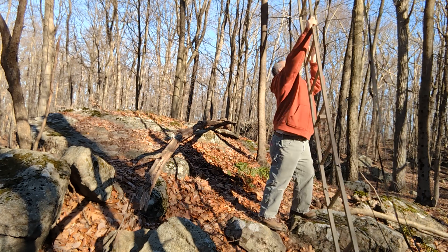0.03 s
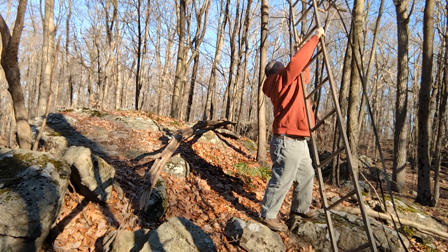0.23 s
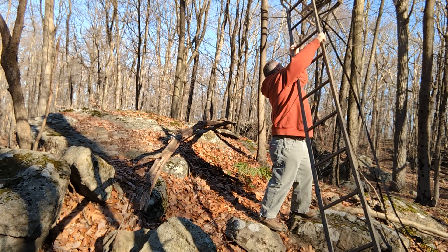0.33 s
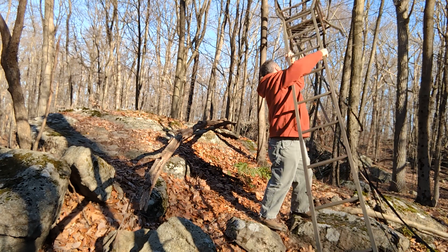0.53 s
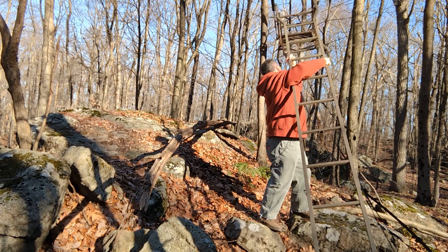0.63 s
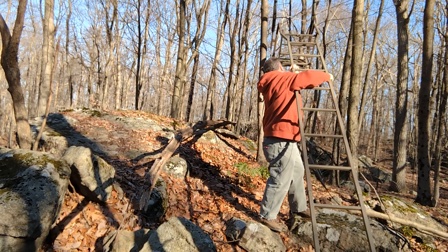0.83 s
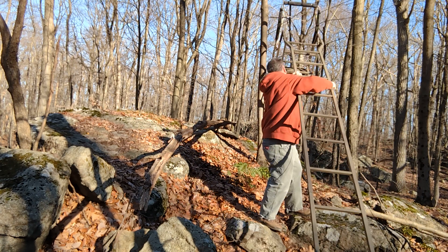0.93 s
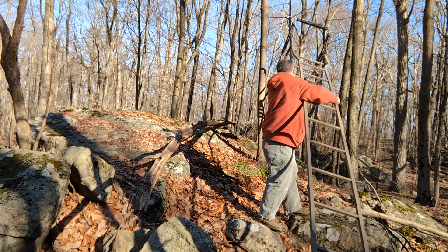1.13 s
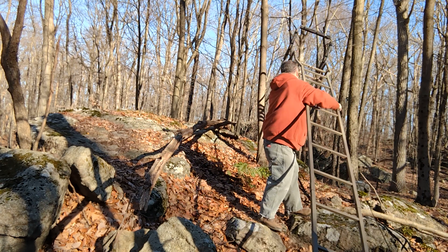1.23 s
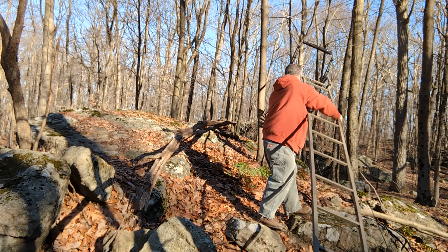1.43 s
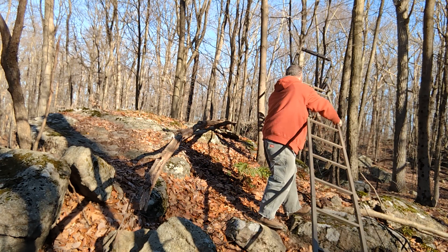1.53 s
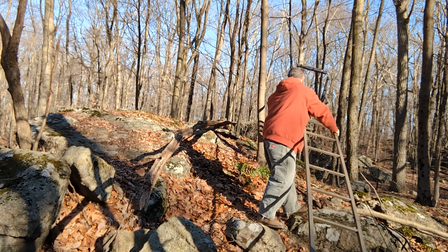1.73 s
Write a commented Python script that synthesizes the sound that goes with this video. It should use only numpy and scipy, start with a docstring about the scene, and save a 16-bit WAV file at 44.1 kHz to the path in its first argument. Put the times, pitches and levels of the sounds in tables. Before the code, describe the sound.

A metal ladder rattles and drags through dry leaves in the woods, a few metres off and slightly right. It lands with a ringing thump, followed by clanks, crunching leaves and snapping twigs that fade with a short echo.

```python
"""Dry leaves rustle faintly, then scrape, as a steel ladder stand is swung round on a rocky forest floor,
a few metres from the microphone and a little to the right. Its feet drag through the leaves and one
thumps down; the loose joints chatter, the tubes clank and the frame rings and hums. Twigs snap and
leaves crunch as it settles. Ground and rocks throw back near echoes; trunks scatter a short tail."""
import sys
import numpy as np
from scipy import signal
from scipy.fft import rfft, irfft, next_fast_len
from scipy.io import wavfile
from scipy.ndimage import map_coordinates

SR = 44100
rng = np.random.default_rng(int(sys.argv[2]) if len(sys.argv) > 2 else 0)


def transcribe(u):
    """Save the signal u as a 16-bit wav file named by the first command-line argument.

    u: samples, shape (n,) or (channels, n), limited to [-1, 1]; the rate is SR.
    q: integer samples, one column per channel.
    """
    v = np.clip(np.atleast_2d(u).T, -1, 1)
    q = np.round(v * 32767).astype(np.int16)
    wavfile.write(sys.argv[1], SR, q)


N = 79380
TOP_HZ, LOW_CUT_HZ = 16400, 31  # the microphone's band
ATTACK_S = 0.00064  # rise of a knock or snap


def amp(db):
    """Decibels to gain."""
    return 10 ** (np.asarray(db) / 20)


def unit(x):
    """Scale to rms 1."""
    return x / np.sqrt(np.mean(x ** 2) + 1e-20)


def sized(x, reference, db=0):
    """x scaled to the energy of the reference, then raised by db."""
    return amp(db) * unit(x) * np.sqrt(np.mean(reference ** 2))


def decay(t, t60):
    """A fall of 60 dB every t60 seconds."""
    return np.exp(-np.log(1000) * t / t60)


def curve(points):
    """Join (t/s, value) points, one value per sample."""
    return np.interp(np.arange(N) / SR, *np.transpose(points))


def gain_at(spectrum, f):
    """Gain at f from (f/Hz, level/dB) points joined on a log frequency axis."""
    hz, db = np.transpose(spectrum)
    return amp(np.interp(np.log(f + 1), np.log(hz + 1), db))


def filtered(x, response):
    """x through a complex frequency response."""
    size = next_fast_len(N + SR)
    f = np.fft.rfftfreq(size, 1 / SR)
    return irfft(rfft(x, size) * response(f), size)[..., :N]


def resonate(x, peaks):
    """x through parallel (f/Hz, width/Hz, level/dB) resonances of alternating sign."""
    def response(f):
        return sum((-1) ** k * amp(db) * 1j * f * width / (hz * hz - f * f + 1j * f * width)
                   for k, (hz, width, db) in enumerate(peaks))
    return filtered(x, response)


def ring(modes, start, spread_db):
    """Damped modes struck at start, their strengths a little different at each blow."""
    t = np.maximum(np.arange(N) / SR - start, 0)
    return sum(amp(db + spread_db * rng.standard_normal()) * np.sin(2 * np.pi * hz * t) * decay(t, t60)
               for hz, db, t60 in modes)


def crackle(per_s, spread_db, hiss_share):
    """Tiny contacts of random size over a bed of hiss, rms about 1."""
    sizes = amp(spread_db * np.minimum(rng.exponential(size=N), 3.5))
    signs = rng.choice([-1, 1], N)
    clicks = unit(sizes * signs * (rng.random(N) < per_s / SR))
    return np.sqrt(1 - hiss_share) * clicks + np.sqrt(hiss_share) * rng.standard_normal(N)


def flurry(start, db, hold, t60, per_s, hiss_share):
    """One sharp contact followed by a dying flurry of small ones."""
    t = np.arange(N) / SR - start
    envelope = np.clip(t / ATTACK_S, 0, 1) * decay(np.maximum(t - hold, 0), t60)
    first = unit(1.0 * (np.arange(N) == int((start + ATTACK_S) * SR)))
    rest = unit(envelope * crackle(per_s, spread_db=3, hiss_share=hiss_share))
    first_share = 0.4 * ATTACK_S / (ATTACK_S + hold / 2)  # of the energy; most in brief knocks
    return sized(np.sqrt(first_share) * first + np.sqrt(1 - first_share) * rest, envelope, db)


# Spectrum of the forest air around the microphone: f/Hz, level/dB
AIR_SPECTRUM = [(20, -42), (35, -12), (50, -6), (85, -2), (130, -9.5), (300, -12), (1000, -36.5),
                (5000, -24), (16000, -27.5)]
def air():
    """A faint outdoor rumble, mostly common to both sides."""
    noise = rng.standard_normal(N) + np.array([[.7], [.3]]) * rng.standard_normal((2, N))
    return amp(-68) * unit(filtered(noise, lambda f: gain_at(AIR_SPECTRUM, f)))


def trunks(x, t60):
    """The surrounding trunks scatter the sound into a diffuse stereo tail."""
    t = np.arange(SR // 2) / SR
    tail = rng.standard_normal((2, len(t))) * decay(t, t60)
    tail /= np.linalg.norm(tail, axis=1, keepdims=True)
    return signal.fftconvolve(x, tail, axes=1)[:, :N]


def near_echoes(x, count=8, delay_scale_s=.005, drift_hz=25.16):
    """Echoes off ground and rocks; their strengths drift with the motion, their total power stays."""
    spacing = (np.arange(count) + rng.random(count) + 1) / count
    delays = (delay_scale_s * SR * spacing ** 2).astype(int)
    knots = np.arange(N) * drift_hz / SR
    gains = np.array([map_coordinates(rng.standard_normal(400), [knots], mode="mirror") for _ in delays])
    gains /= np.linalg.norm(gains, axis=0)
    return sum(gain * np.pad(x, (delay, 0))[:N] for gain, delay in zip(gains, delays))


def from_right(f, lag_s=.00012):
    """Stereo response of a sound that reaches the microphone's right side first."""
    return np.exp(1j * np.pi * f * lag_s * np.array([[-1], [1]]))


def pan(right_db):
    """Stereo gains with the right side right_db above the left."""
    return amp([[-right_db / 2], [right_db / 2]])


# Scattered against direct sound at the microphone, before wet_db is added: f/Hz, level/dB
SCATTER_SPECTRUM = [(100, -14), (400, -19), (900, -3.5), (2500, 0.5), (6000, 3.5), (14000, 7)]
def place(x, right_db, wet_db):
    """Set a source a few metres off: direct sound plus near echoes that blur the treble."""
    def wet(f):
        return gain_at(SCATTER_SPECTRUM, f) * amp(wet_db)
    direct = filtered(x, lambda f: from_right(f) / np.hypot(1, wet(f)))
    echoes = np.array([near_echoes(x), near_echoes(x)])
    scattered = filtered(echoes, lambda f: wet(f) / np.hypot(1, wet(f)))
    return (direct + scattered) * pan(right_db)


# Soft footfalls on the rock: t/s, level/dB
FOOTFALLS = [(1.024, -64.5), (1.49, -84), (1.535, -64), (1.662, -72)]
# Modes of the ground underfoot: f/Hz, level/dB, t60/s
GROUND_MODES = [(56.4, 4, .14), (80, -4, .08)]
def footfalls():
    """Shifting weight gives dull pushes into the ground."""
    return sum(amp(db) * ring(GROUND_MODES, start, spread_db=2) for start, db in FOOTFALLS)


# Swell of the hum as the stand sways: t/s, level/dB
SWAY_LEVEL = [(0, -94), (.3, -68.5), (1.08, -69.5), (1.17, -58), (1.35, -66), (1.55, -67.5), (1.8, -83.5)]
# Low resonances of the rails: f/Hz, width/Hz, level/dB
RAIL_PEAKS = [(157.6, 13, -2), (238.5, 22.5, -6.5), (330, 140, -13.5)]
def rail_hum():
    """The long rails flex and hum as the stand sways."""
    return amp(curve(SWAY_LEVEL)) * unit(resonate(rng.standard_normal(N), RAIL_PEAKS))


# Blows to the frame: t/s, level/dB
FRAME_BLOWS = [(.284, -52), (.485, -58), (.818, -56), (.987, -57), (1.177, -67), (1.466, -71)]
# Long-ringing modes of the steel frame: f/Hz, level/dB, t60/s
FRAME_MODES = [(695, -8, .45), (848, -8, .35), (985, -7, .3), (1103, 1.5, .45), (1696, -3.5, .6),
               (1825, -8, .4), (2315, -6, .6), (2519, -7, .6), (2615, -6, .5), (3256, -9, .5),
               (5835, -8, .4)]
def frame_ring():
    """The whole frame rings on after the harder blows."""
    return sum(amp(db) * ring(FRAME_MODES, start, spread_db=6) for start, db in FRAME_BLOWS)


# Twigs and leaves breaking on the forest floor: t/s, level/dB, hold/s, t60/s, f/Hz
TWIG_SNAPS = [(0.047, -51, 0.0051, 0.2, 7400), (0.197, -43.5, 0.0014, 0.015, 7050),
              (0.683, -32.5, 0.0014, 0.009, 14900), (.646, -40.5, .004, .015, 7360),
              (0.765, -52, 0.0011, .008, 5000), (.8165, -36, .003, .04, 10300),
              (0.872, -34, .002, 0.017, 10400), (0.943, -36, .001, 0.013, 5000),
              (.9735, -50, 0.00078, .012, 14500), (.987, -40, 0.0036, 0.021, 13100),
              (1.0178, -32, 0.0014, 0.012, 14700), (1.142, -41.5, .003, 0.046, 11500),
              (1.176, -48, 0.006, 0.078, 11100), (1.193, -48, 0.0022, .012, 9750),
              (1.243, -50, .001, .012, 14000), (1.274, -46.5, 0.0014, .02, 10900),
              (1.3196, -48, 0.0036, .05, 9000), (1.414, -43, .002, .025, 4540),
              (1.463, -48.5, 0.0085, 0.037, 10600), (1.5415, -46.5, 0.0018, 0.041, 4500),
              (1.7155, -55.5, 0.0035, 0.068, 14000)]
def twig_snaps(width_ratio=0.091, low_edge_hz=900):
    """Dry twigs and leaves break in bright bursts: a narrow resonance over thin crackle."""
    out = np.zeros(N)
    for start, db, hold, t60, hz in TWIG_SNAPS:
        crack = flurry(start, db, hold, t60, per_s=2500, hiss_share=0.4)
        pitched = resonate(crack, [(hz, width_ratio * hz, 0)])
        thin = filtered(crack, lambda f: (1j * f / (low_edge_hz + 1j * f)) ** 2)
        out += sized(pitched + 0.54 * thin, crack, db=1)
    return out


# Strength of the drag through the leaves, just right of centre: t/s, level/dB
DRAG_LEVEL = [(0, -55), (.12, -58), (.18, -57), (.23, -55.5), (.31, -52.5), (.35, -45), (.41, -41.5),
              (.455, -45), (.495, -35), (.54, -40), (.67, -43.5), (.71, -49), (.79, -48.5), (.84, -43),
              (.93, -45.5), (1.0, -51.5), (1.1, -52.5), (1.2, -51), (1.3, -57), (1.39, -62.5),
              (1.48, -53.5), (1.56, -59), (1.68, -72), (1.8, -73)]
# Spectrum of the dry leaves from a few metres: f/Hz, level/dB
LEAF_SPECTRUM = [(60, -31), (130, -14.5), (200, -16), (400, -4), (700, -4), (1100, -3), (1400, -3.5),
                 (2500, 0), (4000, -4), (5000, -4), (7200, -5.5), (8000, -11), (9000, -5), (11000, -8.5),
                 (13000, -4.5), (16000, -14)]
def leaf_drag():
    """The feet plough through dry leaves, which rustle all around; the grit sets the frame singing."""
    level = amp(curve(DRAG_LEVEL))
    grit, left, right = [level * crackle(per_s=5000, spread_db=3.5, hiss_share=.55) for _ in range(3)]
    def wet(f):
        return gain_at(SCATTER_SPECTRUM, f)
    direct = filtered(grit, from_right)
    around = filtered(np.array([left, right]), wet)
    rustle = filtered(direct + around, lambda f: gain_at(LEAF_SPECTRUM, f) / np.hypot(1, wet(f)))
    frame_peaks = [(hz, np.log(1000) / np.pi / t60, db) for hz, db, t60 in FRAME_MODES]
    singing = resonate(direct, frame_peaks)
    return (sized(rustle, level, db=2) + sized(singing, level, db=-17.5)) * pan(right_db=1.5)


def leaf_flicks(per_s=170, typical_hz=7550, log_spread=.6, t60_cycles=42, length_s=.03):
    """Single leaves flick, each with its own brief pitch, swelling and fading with the drag."""
    draws = rng.random((int(per_s * N / SR), 3))
    t = np.arange(int(length_s * SR)) / SR
    out = np.zeros(N + len(t))
    for when, pitch, size in draws:
        hz = min(typical_hz * np.exp(log_spread * np.sqrt(3) * (2 * pitch - 1)), TOP_HZ)
        flick = np.sin(2 * np.pi * hz * t) * decay(t, t60_cycles / hz)
        out[int(when * N):][:len(t)] += size ** 2 * unit(flick)
    return amp(curve(DRAG_LEVEL) - 9) * unit(out[:N])


def rattle(knocks, body_peaks, per_s, hiss_share, width_ratio=0.87):
    """Each knock is a flurry of steel contacts in a broad band of its own, ringing the same body."""
    force = np.zeros(N)
    for start, db, hold, t60, hz in knocks:
        contacts = flurry(start, db, hold, t60, per_s, hiss_share)
        force += sized(resonate(contacts, [(hz, width_ratio * hz, 0)]), contacts)
    return sized(resonate(force, body_peaks), force)


# Tube striking tube: t/s, level/dB, hold/s, t60/s, band centre f/Hz
TUBE_KNOCKS = [(.238, -39, 0.0041, 0.17, 1320), (.275, -38.5, 0.0034, .03, 900),
               (.2825, -39.5, 0.004, 0.041, 1140), (0.301, -47, .004, 0.046, 1090),
               (.808, -36, .004, 0.013, 1800), (0.8133, -41, 0.015, 0.086, 800),
               (0.88, -47, 0.0078, 0.17, 1500), (0.918, -44.5, 0.013, 0.15, 990),
               (0.946, -41, .010, 0.054, 1720), (0.9775, -38, .004, 0.046, 1720),
               (0.9848, -40.5, .006, 0.077, 1300), (1.047, -48, .004, 0.045, 1390),
               (1.146, -46.5, 0.0052, 0.1, 1680), (1.1762, -48, 0.0062, 0.047, 1720),
               (1.34, -57.5, .012, 0.031, 790), (1.416, -47.5, 0.005, 0.02, 2260),
               (1.461, -53.5, 0.0051, 0.046, 1510), (1.71, -67.5, .01, 0.057, 1680),
               (1.757, -61.5, 0.0018, 0.024, 1800)]
# Resonances of the tubes: f/Hz, width/Hz, level/dB
TUBE_PEAKS = [(490, 480, -11), (745, 160, -6), (985, 180, -6.5), (1108, 102, -2), (1236, 125, -7),
              (1676, 130, -5), (1894, 124, -6.5), (2333, 220, -9), (2640, 130, -5)]
def tube_clanks():
    """The steel tubes knock together and ring in the midrange."""
    return rattle(TUBE_KNOCKS, TUBE_PEAKS, per_s=1000, hiss_share=0.18)


# Knocks in the joints, right of the microphone: t/s, level/dB, hold/s, t60/s, band centre f/Hz
JOINT_KNOCKS = [(.2368, -31, 0.0061, 0.097, 7500), (.8155, -35, 0.0026, 0.038, 3400),
                (.849, -38.5, 0.0025, 0.055, 6000), (.8722, -34.5, 0.0013, 0.063, 4400),
                (.893, -45, 0.0047, 0.05, 3000), (.9248, -38, .014, 0.053, 6500),
                (1.0195, -41.5, 0.0025, 0.059, 5870), (1.213, -48.5, 0.0086, 0.16, 4830),
                (1.33, -56, .02, .05, 4200), (1.4145, -47, 0.0029, .04, 4350),
                (1.4645, -48.5, 0.007, 0.13, 2800), (1.5395, -47, 0.0035, 0.025, 4950),
                (1.6372, -58.5, 0.0026, 0.047, 5530), (1.79, -58, .01, .06, 3480)]
# Resonances of the joints: f/Hz, width/Hz, level/dB
JOINT_PEAKS = [(605, 150, -12), (1000, 200, -5), (1800, 490, -6.5), (2670, 350, -1), (3310, 135, 3),
               (4110, 370, -2), (5707, 560, -0.5), (6070, 390, 4), (6530, 490, -2.5), (7150, 230, -0.5),
               (10200, 6800, -22)]
def joint_chatter():
    """The loose joints chatter brightly, steel on steel."""
    return rattle(JOINT_KNOCKS, JOINT_PEAKS, per_s=1500, hiss_share=0.37)


# A foot of the stand meeting the ground, a few metres away: t/s, level/dB
FOOT_LANDINGS = [(0.8145, -25.5), (0.8445, -42.5)]
# Modes of the thump: f/Hz, level/dB, t60/s
FOOT_MODES = [(97, -30, .15), (144, -25, 0.24), (275, -20.5, .45), (354, -12, 0.28), (413, 1.5, 0.055),
              (446, 0, 0.068), (541.6, -14, 0.24), (741, -9.5, 0.076), (1070, -21, 0.057)]
def foot_thump(rise_s=0.0031):
    """One foot of the stand lands hard and settles."""
    out = np.zeros(N)
    for start, db in FOOT_LANDINGS:
        onset = curve([(start, 0), (start + rise_s, 1)])
        out += amp(db) * onset * ring(FOOT_MODES, start, spread_db=1.2)
    return out


def scene():
    """Ladder and leaves among the trees, as they reach the microphone."""
    joints = place(joint_chatter(), right_db=3, wet_db=-2.5)
    body = tube_clanks() + frame_ring() + foot_thump() + footfalls() + rail_hum()
    stand = joints + place(body, right_db=-.3, wet_db=0)
    litter = leaf_drag() + place(twig_snaps() + leaf_flicks(), right_db=-.1, wet_db=-3)
    near = stand + litter
    return near + amp(-16) * trunks(near, t60=0.54) + air()


def record(dry):
    """The stereo microphone sheds the deepest bass and passes nothing above TOP_HZ."""
    return filtered(dry, lambda f: (f < TOP_HZ) * f ** 3 / np.hypot(f ** 3, LOW_CUT_HZ ** 3))


dry = scene()
out = record(dry)
transcribe(out)
```